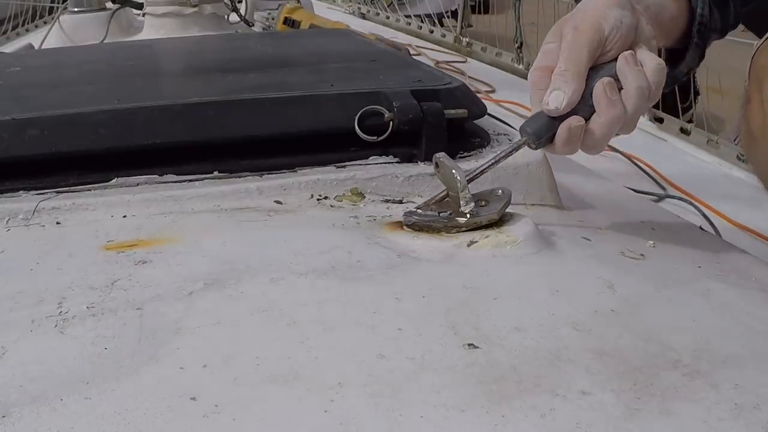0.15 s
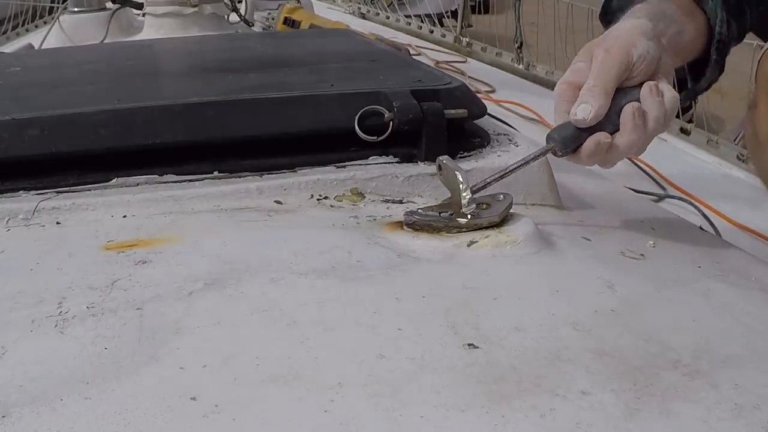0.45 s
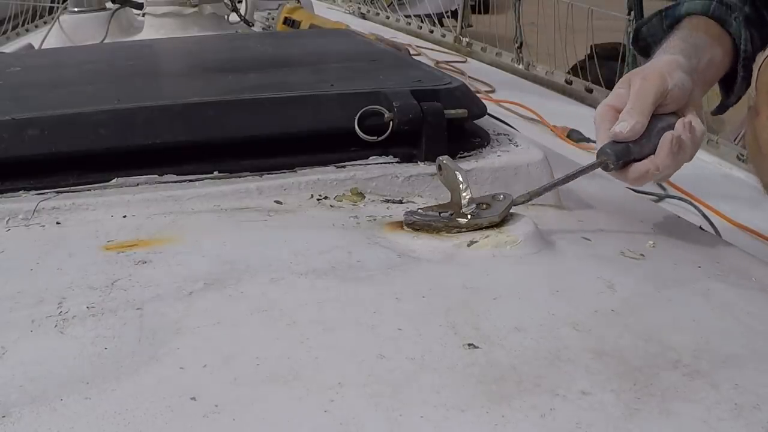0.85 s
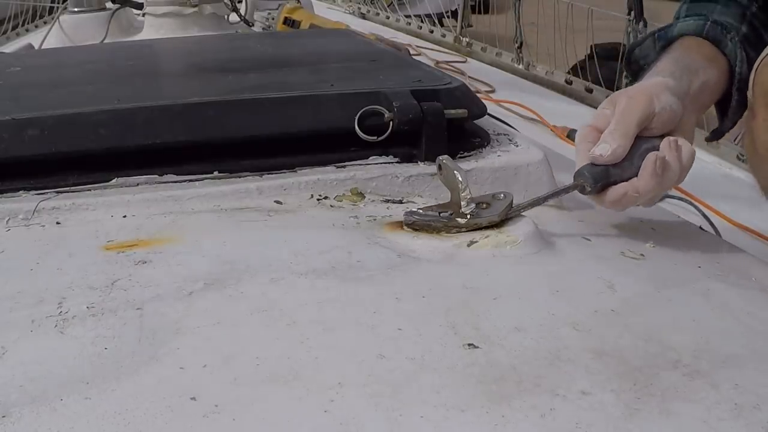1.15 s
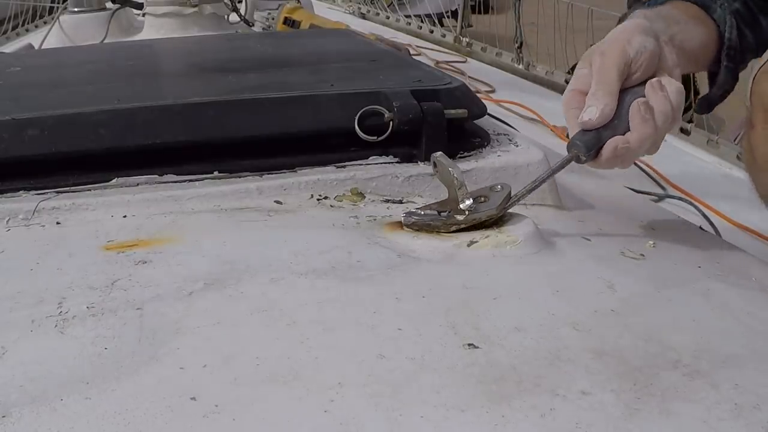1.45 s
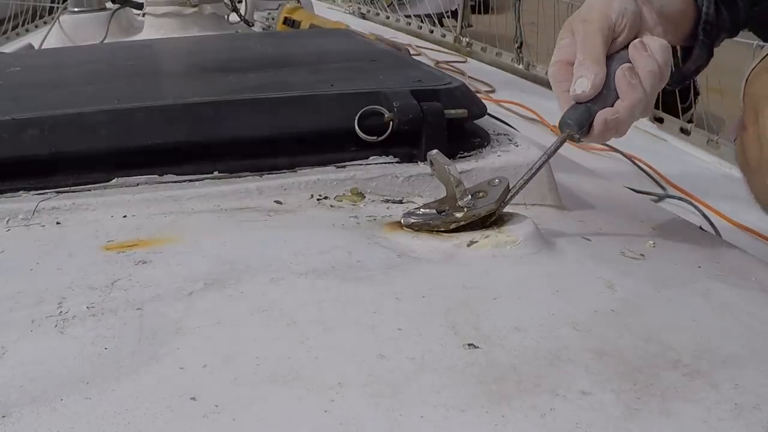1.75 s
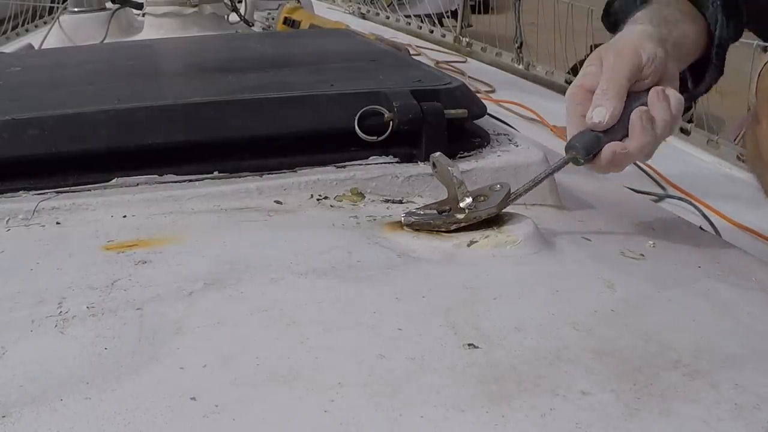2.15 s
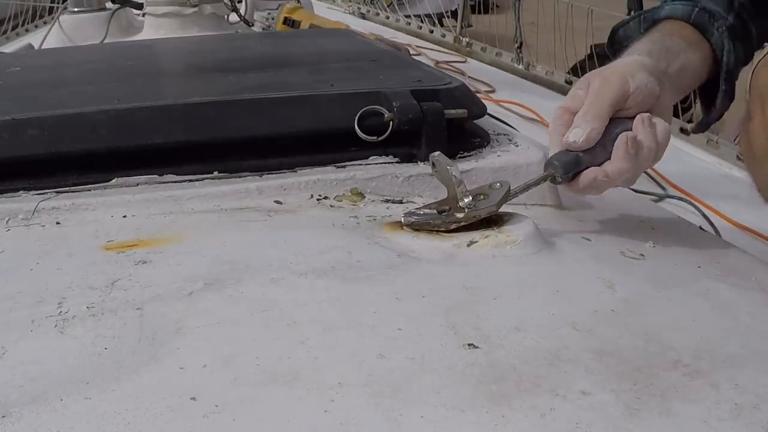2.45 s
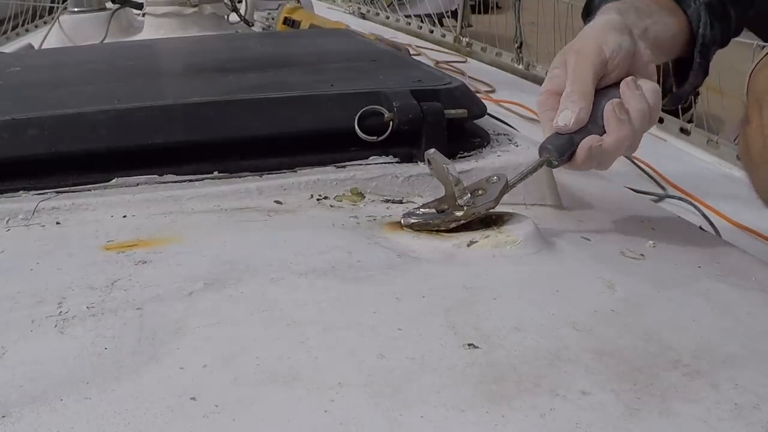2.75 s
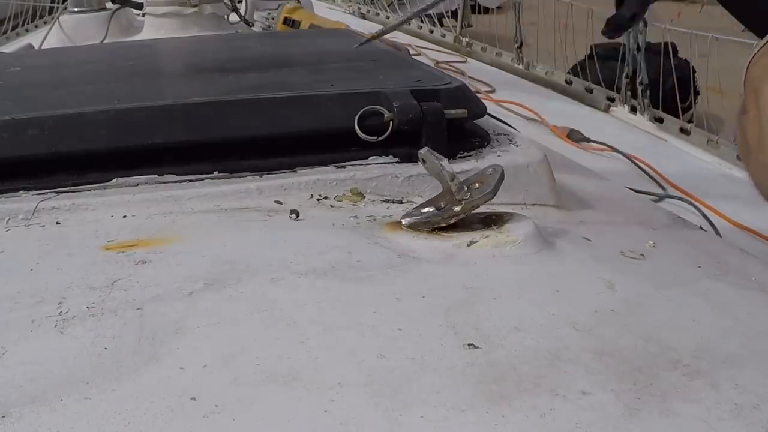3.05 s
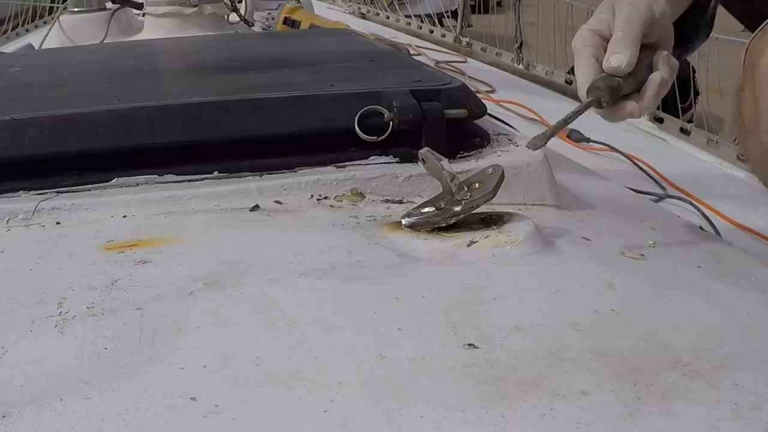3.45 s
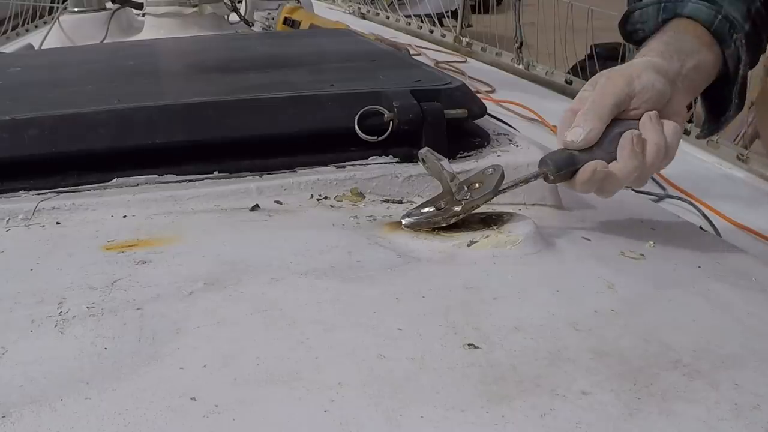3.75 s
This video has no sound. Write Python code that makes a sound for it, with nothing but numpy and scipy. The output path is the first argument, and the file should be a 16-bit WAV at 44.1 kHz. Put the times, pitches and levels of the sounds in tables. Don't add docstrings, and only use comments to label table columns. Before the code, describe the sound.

Close metallic clicks and gritty slips of a blade under a bracket, quiet at first, peaking late with a hollow deck knock, then a few last ticks; windy yard, faint motor hum, soft hiss, wind rumble on the microphone.

```python
import sys
import numpy as np
from scipy import signal
from scipy.fft import rfft, irfft
from scipy.io import wavfile
from scipy.ndimage import uniform_filter1d

SR = 44100
rng = np.random.default_rng(int(sys.argv[2]) if len(sys.argv) > 2 else 0)


def transcribe(u):
    v = np.clip(np.atleast_2d(u).T, -1, 1)
    q = np.round(v * 32767).astype(np.int16)
    wavfile.write(sys.argv[1], SR, q)


def attenuation_scalar(level_db):
    decades = np.asarray(level_db, float) / 20
    return 10 ** decades


N = 171990
T = np.arange(N) / SR

# (frequency [Hz], level [dB], decay t60 [s])
BRACKET = [(1420, -14, 0.074), (1534, -5, 0.027), (1756, 8.5, 0.016), (2050, -2, 0.019), (2630, -6, 0.03)]
SHAFT = [(3300, -10, .015), (3750, -10, .012), (4600, -2, .02)]
TIP = [(5600, -2.5, 0.022), (6110, 2, 0.013), (6400, 4.5, 0.011), (6770, -0.5, 0.018), (7200, -20, 0.018)]
# (low edge [Hz], high edge [Hz])
METAL_BANDS = [(1300, 5100), (2900, 3880), (5000, 7950)]
SCATTER_DB, DETUNE = 2.5, 0.012
# (time [s], gain [dB])
AUTO_GAIN = [(0, 0), (1.77, 0), (1.79, -2), (1.9, -1.5), (2.7, 0), (3.28, 0), (3.42, -0.5), (3.52, -3),
             (3.56, -2), (3.8, -5.5)]


def evened(x):
    return x / np.sqrt(np.mean(x ** 2) + 1e-20)


def read(points, hz):
    f, value = np.transpose(points)
    return np.interp(np.log(hz + 1), np.log(f + 1), value)


def colour(x, points):
    gain_db = read(points, np.fft.rfftfreq(x.shape[-1], 1 / SR))
    return irfft(rfft(x) * attenuation_scalar(gain_db), x.shape[-1])


def band(x, hz):
    return signal.sosfilt(signal.butter(2, hz, "band", fs=SR, output="sos"), x)


def add(mix, s, sound):
    part = mix[round(s * SR):][:len(sound)]
    part += sound[:len(part)]


def ring(modes, scatter_db=0., detune=0.):
    t = np.arange(8000) / SR
    out = np.zeros(8000)
    for hz, db, t60 in modes:
        level_luck, pitch_luck = rng.standard_normal(2)
        decay = attenuation_scalar(db + scatter_db * level_luck - 60 * t / t60)
        out += decay * np.sin(2 * np.pi * hz * (1 + detune * pitch_luck) * t)
    return out


def soft_start():
    return np.minimum(np.arange(8000) / 60., 1)


def grains(size, per_s, spread_db):
    hits = rng.random(size) < per_s / SR
    sign = np.sign(rng.random(size) - .5)
    return hits * sign * attenuation_scalar(spread_db * np.minimum(rng.exponential(1, size), 4))


def wander(hz):
    noise = rng.standard_normal(N + SR)
    return evened(signal.lfilter([1], [1, -np.exp(-np.pi * hz / SR)], noise)[SR:])


def wind():
    # (middle [s], length [s], level [dB])
    gusts_left = [(.58, 0.041, -27.5), (.98, 0.2, -21.5), (1.17, 0.13, -14), (1.31, 0.055, -13),
                  (1.45, 0.072, -26.5), (1.78, 0.06, -14), (1.93, 0.14, -22), (2.04, 0.07, -28),
                  (2.3, 0.24, -27), (2.58, 0.046, -19.5), (2.97, 0.11, -24.5), (3.3, 0.028, -13),
                  (3.39, 0.083, -12.5), (3.53, 0.092, -8.5), (3.64, 0.073, -21.5)]
    gusts_right = [(.3, 0.15, -31.5), (.7, 0.02, -17.5), (.92, 0.45, -23), (1.22, 0.44, -20.5),
                   (1.34, 0.015, -12), (1.46, 0.14, -23.5), (1.77, 0.11, -18), (1.95, 0.015, -11),
                   (2.01, 0.035, -21), (2.2, 0.18, -25.5), (2.39, 0.039, -16), (2.56, 0.075, -25),
                   (2.68, 0.058, -36), (3.18, 0.046, -18.5), (3.28, 0.079, -16.5), (3.39, 0.12, -13.5),
                   (3.54, 0.096, -14.5), (3.66, 0.056, -20.5)]
    # (frequency [Hz], level [dB])
    gust_curve = [(25, -18), (60, 1.5), (130, -1), (250, -5), (450, -19.5), (800, -41), (3000, -86)]
    breeze_curve = [(15, -14), (30, -2), (55, 0), (100, -2.5), (200, -9), (350, -17.5), (600, -36),
                    (1200, -66.5)]
    fizz_curve = [(120, -46), (350, 6.5), (800, -12.5), (2500, -75)]
    gust_trim_db, fizz_db, lump_db = 2., 1.5, 3.5
    breeze_db, breeze_pan_db = -20.5, 0.5
    ports = []
    for gusts, side in ((gusts_left, 1), (gusts_right, -1)):
        energy = sum(attenuation_scalar(2 * db) * np.exp(-((T - s) / (length / 2)) ** 4) for s, length, db in gusts)
        force = np.sqrt(energy)
        swirl = grains(N, 500., 3.)
        eddies = evened(colour(swirl, gust_curve))
        eddies = eddies + attenuation_scalar(fizz_db) * force * evened(colour(swirl, fizz_curve))
        lumps = rng.standard_normal(N) * attenuation_scalar(lump_db * wander(23.0))
        breeze = evened(colour(lumps, breeze_curve))
        ports.append(attenuation_scalar(gust_trim_db) * force * eddies + attenuation_scalar(breeze_db + side * breeze_pan_db) * breeze)
    ports = np.array(ports)
    cross_band = signal.butter(1, (223, 1090), "band", fs=SR, output="sos")
    return ports - 0.34 * signal.sosfiltfilt(cross_band, ports[::-1])


def hum():
    # (frequency [Hz], width [Hz], level [dB], right gain [ratio])
    motor_lines = [(135.8, 6.27, -25, 0.65), (55.16, 5.92, -26.5, 0.13), (192.7, 9.82, -35, 0.45)]
    out = np.zeros((2, N))
    for hz, width_hz, db, right in motor_lines:
        swell = 1 + 0.04 * wander(14.0)
        pitch = hz + width_hz / 2 * wander(5.57)
        line = swell * np.sin(2 * np.pi * np.cumsum(pitch) / SR)
        out += attenuation_scalar(db) * evened(line) * np.array([[1], [right]])
    return out


def hiss():
    # (frequency [Hz], level [dB])
    hiss_curve = [(600, -1), (1660, -5.5), (2250, -12), (4700, -18.5), (7300, -16.5), (8000, -25.5),
                  (10600, -29), (14500, -76)]
    # (frequency [Hz], likeness [-1 to 1])
    likeness = [(630, 0.18), (1370, -0.1), (3000, 0.67), (6550, 0.13), (9000, -0.27)]
    hiss_db, patch_db = -39.5, 2
    hz = np.fft.rfftfreq(512, 1 / SR)
    a, b, c, d, patches = rng.standard_normal((N // 128 + 5, 257, 5)).T
    patches = uniform_filter1d(patches, size=6, axis=0)
    patches = evened(uniform_filter1d(patches, size=20, axis=1))
    same = np.clip(read(likeness, hz), -1, 1)[:, None]
    left = a + 1j * b
    right = same * left + np.sqrt(1 - same ** 2) * (c + 1j * d)
    tone = attenuation_scalar(read(hiss_curve, hz)[:, None] + patch_db * patches) * (hz > 250)[:, None]
    noise = signal.istft(np.array([left, right]) * tone, nperseg=512, noverlap=384)[1]
    return attenuation_scalar(hiss_db) * evened(noise[:, :N])


def ticks():
    # (time [s], bracket level [dB], shaft level [dB], tip level [dB])
    blade_ticks = [(.0455, -40, -38, -45), (0.284, -48, -50, -46), (0.3558, -43, -38, -33),
                   (0.444, -40, -40, -31.5), (1.004, -25, -33.5, -38), (1.03, -37, -53, -52),
                   (1.314, -28.5, -37.5, -43), (1.438, -28.5, -35.5, -45), (1.515, -34, -41, -54),
                   (1.731, -30, -38, -43), (1.857, -37, -43, -38.5), (2.0648, -44, -42, -37),
                   (2.131, -32, -51, -44), (2.3068, -38, -46, -47), (2.3497, -27, -38, -27),
                   (2.811, -18, -28, -31), (2.847, -47, -46, -38), (2.8596, -45, -37, -38),
                   (2.8877, -29, -50, -40), (2.902, -36, -31.5, -28.5), (2.9686, -25, -34, -39),
                   (2.991, -15, -27, -31), (3.007, -12, -20, -22.5), (3.012, -40, -32, -24),
                   (3.693, -27, -27.5, -23.5), (3.735, -32, -40, -35), (3.7688, -36, -42, -48)]
    trims_db = [0.5, 5, 6.5]
    rise_s, crack_s, rattle_s, rattle_db = 0.00063, 0.0011, 0.0055, -17
    damped = 0.43
    air_db, air_hz = -25.5, (8900, 13900)
    snap_db, snap_hz = -8, (2000, 6800)
    out, t = np.zeros(N), np.arange(4000) / SR
    shape = (1 - np.exp(-t / rise_s)) * (np.exp(-t / crack_s) + attenuation_scalar(rattle_db) * np.exp(-t / rattle_s))
    for s, *levels_db in blade_ticks:
        for modes, db, trim_db, hz in zip((BRACKET, SHAFT, TIP), levels_db, trims_db, METAL_BANDS):
            body = ring([(f, d, t60 * damped) for f, d, t60 in modes], SCATTER_DB, DETUNE)
            knock = rng.standard_normal(4000)
            knock[20] += 3
            sound = band(signal.fftconvolve(shape * knock, body)[:4000], hz)
            add(out, s, attenuation_scalar(db + trim_db) * sound / abs(sound).max())
        tip_db = levels_db[2]
        crack = shape * rng.standard_normal(4000) * 10
        air = attenuation_scalar(tip_db + air_db) * band(crack, air_hz)
        snap = attenuation_scalar(tip_db + snap_db) * band(band(crack, snap_hz), snap_hz)
        add(out, s, air + snap)
    return out


def slips():
    # (time [s], level [dB], frequency [Hz], decay t60 [s])
    blade_slips = [(.284, -34, 3700, 0.014), (.356, -25, 5060, .01), (.357, -31, 1720, .05),
                   (.42, -38, 7240, .03), (.443, -24, 5170, 0.011), (1.004, -18, 1800, 0.037),
                   (1.0043, -28.5, 4660, 0.04), (1.0043, -27, 6400, .03), (1.0304, -21.5, 1920, 0.036),
                   (1.03, -37, 4570, 0.077), (1.031, -34, 6400, .028), (1.045, -22, 1680, 0.022),
                   (1.0492, -18, 1570, 0.032), (1.049, -34, 4640, .06), (1.051, -21, 1775, 0.028),
                   (1.0576, -20, 1720, .018), (2.3073, -28, 1480, .035), (2.3292, -29, 1450, .03),
                   (2.3425, -24, 1634, 0.038), (2.35, -13, 6720, .013), (2.35, -22, 3330, .012),
                   (2.3866, -35, 1670, .025), (2.3075, -37, 4100, .02), (.462, -40, 4250, .04),
                   (.5, -41, 4200, .05), (2.809, -36, 3970, .015), (2.8125, -19, 732, 0.026),
                   (2.848, -26, 6860, .012), (2.86, -30, 5700, .025), (2.901, -24, 5900, 0.017),
                   (2.9698, -26, 1850, 0.027), (2.9917, -11, 1790, 0.02), (2.991, -20, 5960, .012),
                   (3.0051, -10.5, 1758, 0.027), (3.0078, -7, 1797, 0.02), (3.0075, -16, 6480, 0.014),
                   (3.019, -28, 2000, .012), (3.693, -16, 1820, .028), (3.693, -18, 4750, .018),
                   (3.693, -17, 6830, .026), (3.693, -17, 6200, .014), (3.738, -23, 1750, .016),
                   (3.738, -26, 7100, .018), (3.769, -31, 7000, .012)]
    out = np.zeros(N)
    swell = 1 - np.exp(-np.arange(8000) / (0.00046 * SR))
    for s, db, hz, t60 in blade_slips:
        add(out, s, swell * ring([(hz, db, t60), (hz * 1.07, db - 11, t60)]))
    return out


def pings():
    # (time [s], level [dB], frequency [Hz], decay t60 [s])
    lone_modes = [
        (.305, -46, 12100, .012),
        (1.004, -48, 12100, .02),
        (3.006, -41, 12960, .11),
        (3.0125, -14, 4600, .026),
        (2.8125, -9, 2600, .009),
        (2.8125, -4, 1950, .011),
        (2.813, -11, 3600, .011),
        (.476, -34, 4300, .035),
        (.481, -34, 4450, .03),
        (2.338, -29, 1440, .04),
    ]
    out = np.zeros(N)
    for s, db, hz, t60 in lone_modes:
        add(out, s, ring([(hz, db, t60)]) * soft_start())
    return out


def scrapes():
    # (start [s], length [s], bracket level [dB], shaft level [dB], tip level [dB])
    slides = [(0.329, 0.048, -43, -61, -55.5), (0.368, .07, -61, -55, -52), (0.449, 0.05, -56, -66, -50),
              (1.006, 0.025, -35, -51, -54), (1.033, 0.027, -34, -54, -47.5), (1.40, 0.019, -51, -68, -62),
              (2.315, 0.038, -43, -48, -47), (2.353, 0.046, -44, -47.5, -51.5),
              (2.841, 0.049, -58, -66, -50), (2.975, 0.051, -35, -48, -47), (2.998, 0.015, -29, -44, -35),
              (3.062, 0.14, -54, -54.5, -54.5), (3.728, 0.013, -38, -41, -42), (3.75, 0.017, -54, -52, -49)]
    out = np.zeros(N)
    for s, length, *levels_db in slides:
        u = np.arange(0, 1, 1 / (length * SR))
        grit = grains(9000, 4000., 2.)[:len(u)]
        grit = grit * np.sin(np.pi * u) ** 0.42
        for modes, db, hz in zip((BRACKET, SHAFT[1:], TIP[1:]), levels_db, METAL_BANDS):
            sound = band(signal.fftconvolve(grit, ring(modes, SCATTER_DB / 2, DETUNE / 2)), hz)
            add(out, s, attenuation_scalar(db) * sound / np.sqrt(np.mean(sound[:len(u)] ** 2)))
    return out


def pops():
    # (time [s], level [dB], frequency [Hz], left over right [dB])
    bursts = [
        (0.686, -17.5, 207, -10),
        (1.162, -18, 200, 7.5),
        (1.184, -13, 236, 9),
        (1.803, -14, 221, 9),
        (2.555, -23, 236, -5.5),
        (2.592, -19.5, 261, 7.5),
        (2.792, -15, 202, 4.5),
        (3.17, -17, 217, -13.5),
        (3.241, -17.5, 287, -10),
        (3.295, -16.5, 232, -9),
    ]
    cycles = 1.52
    out = np.zeros((2, N))
    for s, db, hz, pan_db in bursts:
        u = np.arange(0, cycles, hz / SR)
        pulse = np.sin(2 * np.pi * u) * np.sin(np.pi * u / cycles) * 2
        add(out[0], s, attenuation_scalar(db + pan_db / 2) * pulse)
        add(out[1], s, -attenuation_scalar(db - pan_db / 2) * pulse)
    return out


def thumps():
    # (time [s], level [dB])
    deck_thumps = [
        (2.8125, 1),
        (3.002, -13),
        (1.3, -17),
    ]
    # (frequency [Hz], level [dB], decay t60 [s])
    deck_modes = [(244, 0.5, 0.14), (305, -4.5, 0.17), (440, -10, .09), (830, -19, 0.042),
                  (1150, -19, 0.05)]
    out = np.zeros(N)
    for s, db in deck_thumps:
        add(out, s, attenuation_scalar(db) * ring(deck_modes) * soft_start())
    return out * np.array([[1], [-0.44]])


def scene():
    duck = attenuation_scalar(0.61 * np.interp(T, *np.transpose(AUTO_GAIN)))
    yard = wind() + hum() + hiss() * duck
    metal = ticks() + slips() + pings() + scrapes()
    aside = attenuation_scalar(-8) * np.roll(metal, round(0.00046 * SR))
    return metal + aside * np.array([[1], [-1]]) + yard + pops() + thumps()


def roll_off(x):
    return signal.sosfilt(signal.butter(12, 14930, fs=SR, output="sos"), x)


def record(dry):
    x = signal.sosfilt(signal.butter(6, 12600., fs=SR, output="sos"), dry)
    x = x * attenuation_scalar(np.interp(T, *np.transpose(AUTO_GAIN)))
    x = x / (1 + (x / .93) ** 4) ** (1 / 4)
    return roll_off(x)


dry = scene()
out = record(dry)
transcribe(out)
```